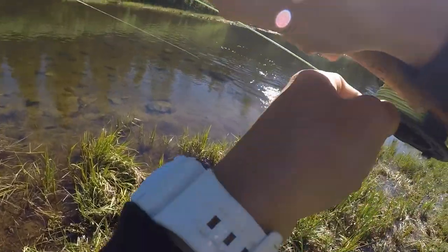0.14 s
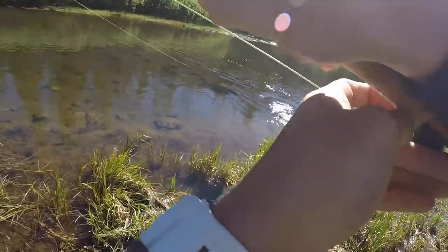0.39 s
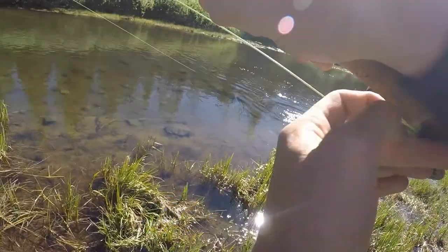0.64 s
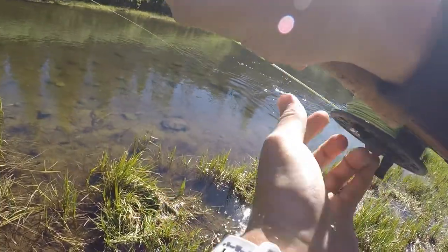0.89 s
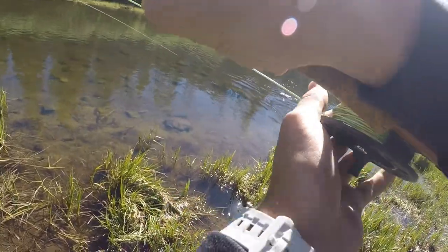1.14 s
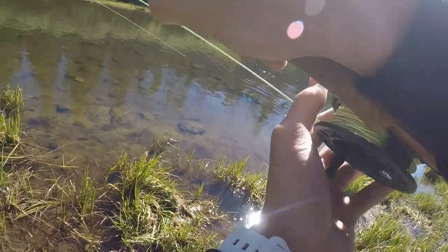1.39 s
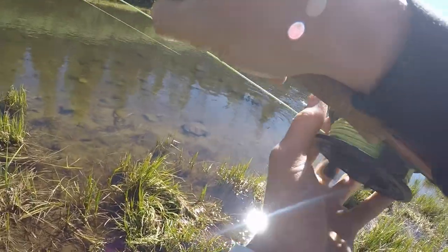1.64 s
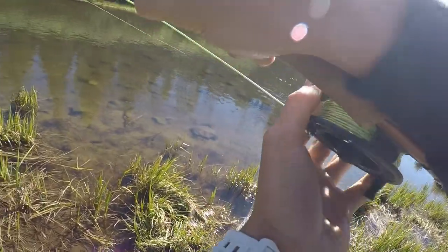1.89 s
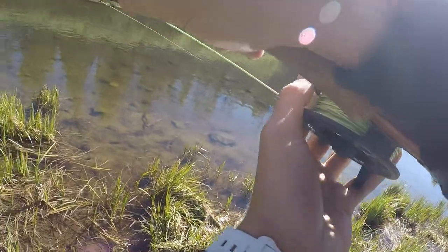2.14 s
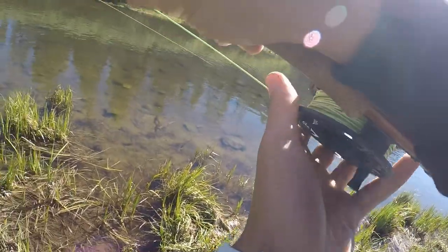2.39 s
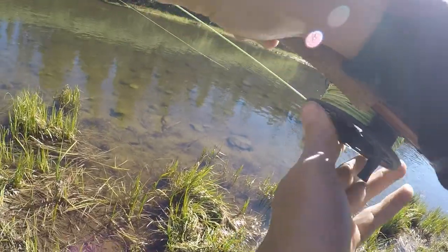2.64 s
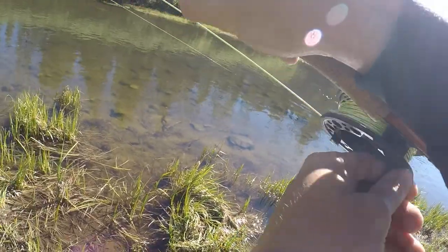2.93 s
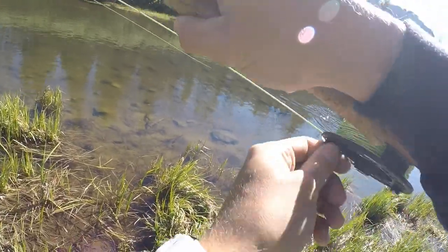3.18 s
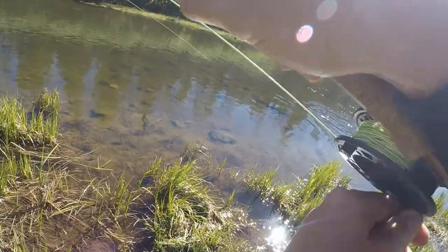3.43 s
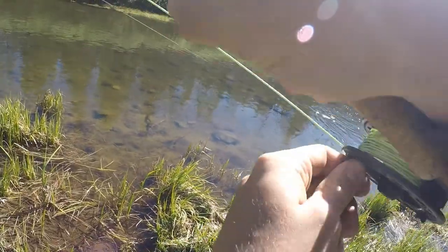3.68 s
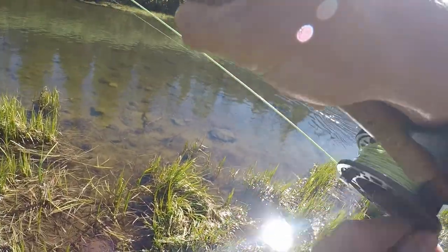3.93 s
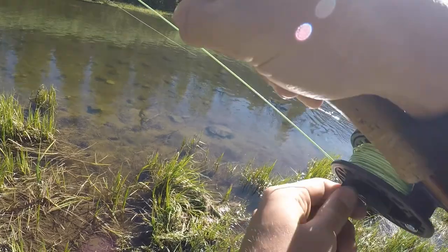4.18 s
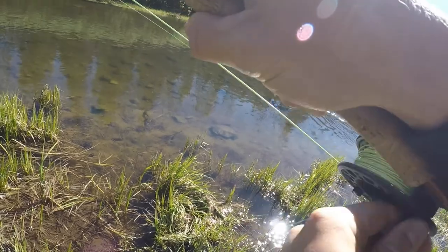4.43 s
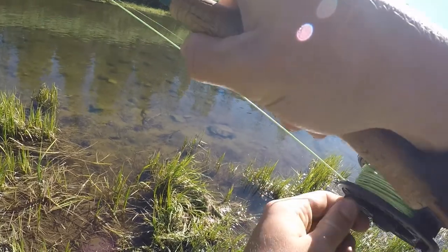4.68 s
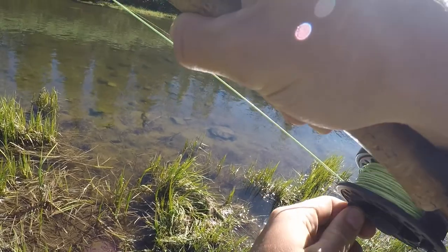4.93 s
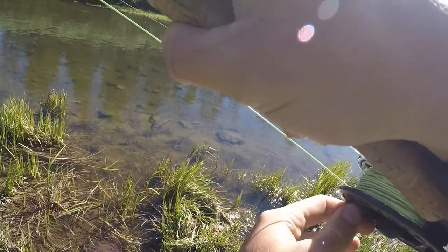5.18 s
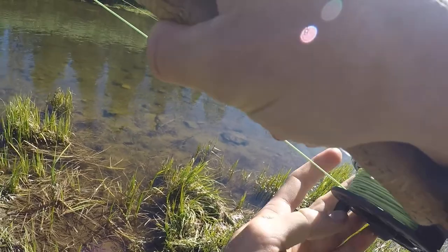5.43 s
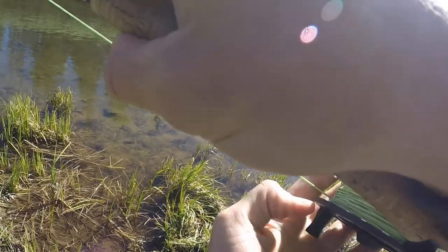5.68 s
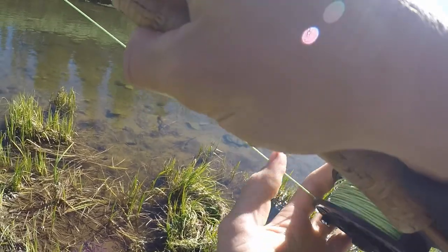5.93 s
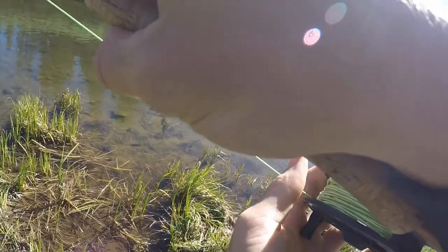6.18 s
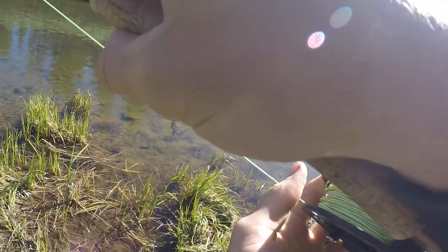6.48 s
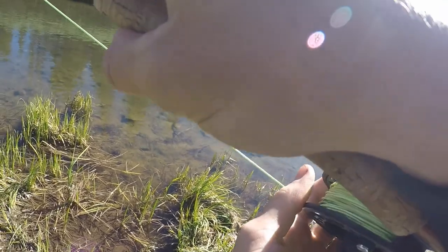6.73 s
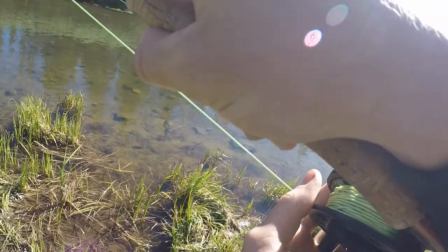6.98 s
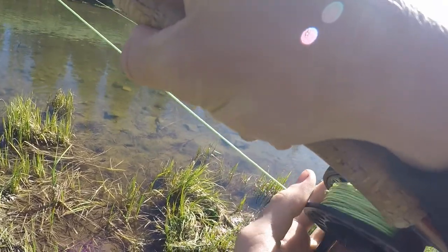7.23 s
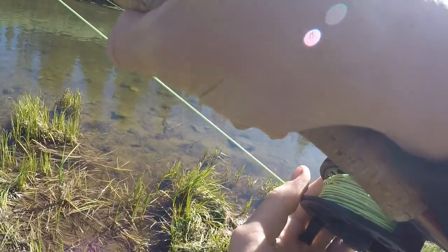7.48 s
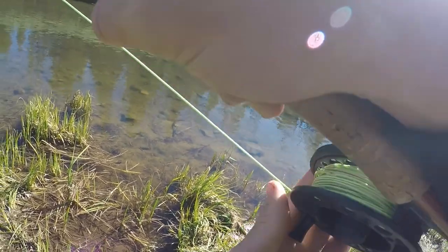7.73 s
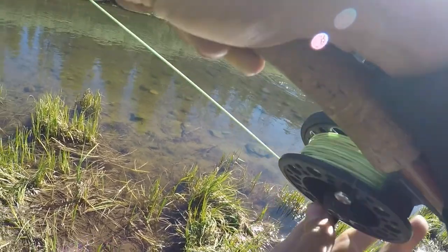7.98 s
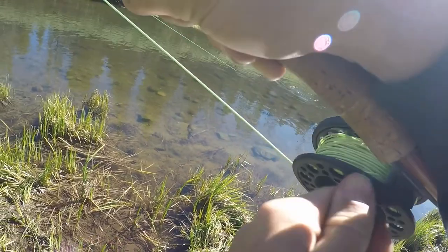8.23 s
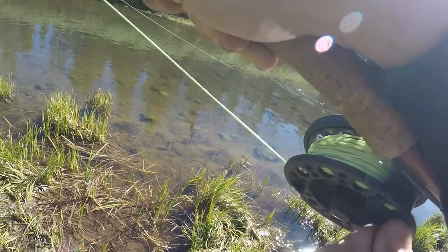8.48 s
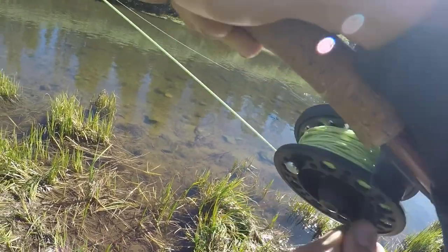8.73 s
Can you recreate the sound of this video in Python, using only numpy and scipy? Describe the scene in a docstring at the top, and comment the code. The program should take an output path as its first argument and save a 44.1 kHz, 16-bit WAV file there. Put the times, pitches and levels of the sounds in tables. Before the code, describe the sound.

A fly reel clicks close by in uneven bursts, from dry ticks to a fast ratcheting whirr, with hollow knocks over low wind rumble.

```python
"""Fly reel by a calm river

Close by, a spring pawl clicks over a 40-tooth gear while line is wound in and a fish pulls it out; each click
is a set of damped rings of cage, hub, rim and frame. The mount of a chest-worn camera knocks as a ringing
housing, the handle knob rattles, fingers tick and skin rubs as shaped noise. Bubbles glide up in pitch over
a noise wash, wind rumbles on the capsule over a distant drone, and something whistles faintly in gliding tones.
"""
import sys
import numpy as np
from scipy import signal
from scipy.fft import rfft, irfft, next_fast_len
from scipy.io import wavfile
from scipy.ndimage import uniform_filter1d, map_coordinates

SR = 44100
rng = np.random.default_rng(int(sys.argv[2]) if len(sys.argv) > 2 else 0)


def output_pcm(signal):
    """Save a mono or channel-first signal as 16-bit PCM at the path in sys.argv[1].

    Samples are clipped to [-1, 1] before scaling.
    """
    pcm = np.clip(np.atleast_2d(signal).T, -1, 1) * 32767
    wavfile.write(sys.argv[1], SR, np.round(pcm).astype(np.int16))


def decibels_to_gain(level_db):
    """Convert a level in decibels to a linear amplitude gain (20 dB per decade)."""
    exponent = np.asarray(level_db, float) / 20
    return 10 ** exponent


N = 390726

# All spectra are relative, as each noise is scaled to rms 1. Ring levels are relative unless called rms.
TEETH, SPOKES = 40, 4
# spells of turning one way: start_s, gap_tooth (a spoke gap faces the camera), nominal cage_hz
SPELLS = [(0, 3.4, 4280), (1, 7, 4460), (2.7, 9.5, 4335), (5.4, 4.6, 4620), (7.8, 11, 4395)]
# runs of the gear, one table each: time_s, teeth_passed
RUNS = [
    [(0.0018, 0), (0.0236, 6), (0.0541, 17), (0.0754, 26), (0.0954, 34), (0.1, 35), (0.1185, 37),
     (0.1346, 38)],
    [(0.2356, 40), (0.2716, 42), (0.3045, 46), (0.341, 54), (0.3559, 58), (0.3819, 64), (0.424, 76),
     (0.4305, 78), (0.4385, 79), (0.4547, 81), (0.4687, 82)],
    [(0.7874, 87), (0.8016, 88), (0.8457, 93), (0.8821, 101), (0.8857, 102), (0.8991, 105)],
    [(1.5114, 113), (1.5219, 114), (1.5355, 116), (1.5583, 121), (1.5931, 132), (1.6395, 153),
     (1.6461, 156), (1.6665, 166), (1.7199, 199), (1.7505, 220), (1.7648, 230), (1.7735, 236),
     (1.7926, 248), (1.8113, 260), (1.824, 268), (1.8293, 271), (1.8492, 281), (1.8696, 291), (1.8935, 303),
     (1.9075, 310), (1.9161, 314), (1.9208, 316), (1.9362, 322), (1.9657, 334), (1.9895, 344), (2.015, 354),
     (2.033, 359), (2.1109, 378), (2.1353, 382), (2.1502, 383)],
    [(2.9064, 387), (3.0212, 392), (3.0491, 394), (3.1225, 400), (3.2018, 403), (3.3076, 409),
     (3.3432, 412), (3.3944, 416), (3.4447, 419), (3.4683, 421), (3.538, 427), (3.6122, 432), (3.6555, 436),
     (3.6981, 441), (3.7651, 446), (3.8569, 452), (3.9507, 461), (4.0246, 469), (4.0763, 473),
     (4.1142, 477), (4.1601, 483), (4.2212, 489), (4.2658, 492), (4.3471, 499), (4.4127, 506),
     (4.4481, 509), (4.4819, 511), (4.586, 518), (4.5981, 519), (4.6406, 523), (4.6537, 524), (4.7368, 529),
     (4.7593, 530), (4.7928, 532), (4.8346, 534)],
    [(5.7977, 538), (5.8195, 539), (5.894, 543), (5.9234, 544), (5.9868, 549), (6.0539, 559), (6.0914, 567),
     (6.1191, 572), (6.1748, 574)],
    [(6.3313, 575), (6.3658, 576), (6.3978, 578), (6.4387, 581), (6.5402, 588), (6.605, 594), (6.6401, 598),
     (6.6971, 605), (6.7273, 607)],
    [(6.9147, 608), (6.9451, 609), (7.0126, 614), (7.05, 620), (7.0833, 626), (7.1792, 638), (7.2084, 642),
     (7.2527, 647), (7.3039, 651), (7.3471, 652), (7.3802, 653)],
    [(8.1542, 663), (8.188, 665), (8.2266, 669), (8.2608, 673), (8.3168, 678), (8.3682, 684), (8.4221, 690),
     (8.4774, 699), (8.5158, 704), (8.5325, 706), (8.5762, 712), (8.5853, 713), (8.6225, 717),
     (8.6731, 725), (8.7071, 730), (8.7771, 739), (8.8088, 744), (8.8544, 750)],
]
# single clicks and faint ticks, most of them between the runs: time_s, cage_db, rim_db, hub_db
LONE_CLICKS = [(0.1964, -29, -37, -36), (0.5234, -35.5, -70, -61), (0.6118, -42, -43, -43),
               (0.7363, -30.5, -47, -41.5), (1.0115, -27, -38, -39), (1.0937, -25.5, -42, -40),
               (1.1192, -26, -38.5, -43), (1.258, -24, -37.5, -36), (1.2949, -23.5, -41, -36),
               (1.3639, -26.5, -38.5, -34), (1.4383, -28, -39, -39), (1.487, -28.5, -38, -37),
               (2.4012, -37.5, -45, -44), (2.782, -41, -43.5, -48), (2.8572, -39, -43.5, -46),
               (3.5948, -33, -43, -44), (4.7865, -31, -36.5, -34), (4.9969, -20, -38, -35),
               (5.1007, -28.5, -40.5, -40), (5.4229, -37.5, -66.5, -78), (5.4852, -26.5, -41.5, -46),
               (5.5579, -43, -59.5, -55), (5.5774, -39, -42, -35), (5.6512, -25.5, -43.5, -36),
               (7.8844, -31, -36, -33), (7.9183, -29, -38, -31), (7.9691, -22.5, -38, -31),
               (8.0123, -36, -36.5, -32), (8.0382, -28, -39, -39), (8.0567, -26, -36, -32),
               (8.0741, -22.5, -35, -35), (8.0931, -41, -37, -38.0), (8.123, -33, -40, -33.5)]
# strength of running clicks as the reel is tilted and moved: time_s, cage_db, rim_db, hub_db
STRENGTH = [(0, -24, -39, -34), (0.05, -28, -37.5, -32), (0.13, -32, -41, -38.5), (0.3, -28, -35, -28),
            (0.37, -34, -42.5, -35.5), (0.425, -36, -36.5, -30), (0.47, -40, -38, -40),
            (0.8, -41, -37, -34.5), (0.86, -28, -39, -31), (0.9, -25.5, -41, -36),
            (1.5, -29.5, -37.5, -34.5), (1.75, -26, -32.5, -33), (1.82, -24, -33.5, -36),
            (1.9, -29, -35, -37.5), (2.15, -22.5, -37.5, -37), (2.9, -36, -42.5, -41),
            (3.2, -34.5, -44.5, -38.5), (3.35, -38, -43, -34), (3.65, -35.5, -39, -34),
            (3.9, -30, -41, -34), (4.1, -31.5, -40, -36.5), (4.33, -28.5, -41, -31.5),
            (4.55, -28.5, -41.5, -37.5), (4.83, -34, -42, -36), (5.8, -22, -42, -36), (5.95, -31, -44, -36),
            (6.04, -21.5, -43.5, -38), (6.5, -23, -42.5, -38.5), (7.4, -17.5, -47, -36),
            (8.15, -27, -35.5, -33.5), (8.27, -32, -34.5, -33), (8.4, -24, -38, -33.5),
            (8.5, -25, -37, -36), (8.56, -23, -36, -31.5), (8.6, -32, -34.5, -34.5),
            (8.76, -24.5, -38, -34.5), (8.86, -22, -33, -33)]
# swing of each ring round the spool, a row per spell: once_a_turn_db, loudest_tooth, twice_a_turn_db, loudest_tooth
CAGE_SWING = [(2, 15, 4, 13.3), (3, 16.6, 3.5, 11.5), (5.5, 14.8, 1.5, 2.2), (4, 34.8, 0, 14),
              (1, 16, 1.5, 11.5)]
RIM_SWING = [(2.7, 25.4, 0.55, 13), (0.3, 27, 0.24, 7.8), (1.7, 18.6, 0.1, 0.2), (0.81, 42, 0.51, 18),
             (2.4, 18.6, 0.84, 11)]
HUB_SWING = [(1.8, 28, 1.1, 16), (0.56, 13, 0.2, 5.3), (4, 35.3, 0.57, 11.6), (1.6, 39, 2.2, 16.7),
             (1.5, 1.8, 0.75, 1.8)]
LONE_SCATTER = 0.5  # share of full scatter
STEADY_PER_S = 800  # teeth a second at which the scatter is halved
# hub modes: pitch_hz, level_db in each spell, rise_ms, fall_ms
HUB_MODES = [(5080, (2.1, 3, 1.6, 2.4, 2), 0.031, 0.39), (6390, (3.5, 1.5, 0.5, 5, 2), 0.12, 0.23)]
# rim modes: pitch_hz, rise_ms, fall_ms, scatter_db, spoke_swing_db, facing_db in each spell
RIM_MODES = [(8300, 0.08, 0.25, 2.5, 4, (8.5, 6.9, 10.5, 10.4, 3.8)),
             (10350, 0.1, 0.33, 2.5, -0.5, (6, 3.5, 4, 12, -5)),
             (12150, 0.084, 0.21, 3, -2.5, (-1, 1, 2, 3.5, 0)),
             (14420, 0.2, 0.26, 3, 0, (0, 4, 3, 10.5, 4.5))]
# scale of each rim mode's random pitch drift as the spool turns: drift_share
RIM_DRIFT = [.045, .04, .035, .015]
BOUNCE_S, BOUNCE_DB = 0.0008, -6  # the pawl tip's second landing: mean delay and mean level
FRAME_HZ = 2985
# the frame's low ring over the rim level: level_db in each spell
FRAME_LEVELS = (2.5, 4.5, 2.5, 5.5, 0)
# pawl dragging up a slow tooth: time_s, level_db
DRAG = [(7.76, -77), (7.82, -58), (7.87, -52), (7.9, -71), (8.0, -60), (8.1, -59), (8.16, -57)]
# colour of the drag: pitch_hz, density_db per Hz
DRAG_COLOUR = [(2500, -120), (3600, -14), (4500, -6), (5400, -12), (7000, -36), (10000, -120)]
# camera mount knocks: start_s, level_db, thump_db relative to the knock
KNOCKS = [(0.068, -33.5, -3), (0.198, -19, -11.5), (0.352, -24, -7.5), (0.3575, -23.5, -16),
          (0.43, -28.5, -7), (0.442, -17.5, -14.5), (0.709, -19.5, -14.5), (0.843, -40, -3),
          (0.883, -32, -4.5), (1.015, -35, -21), (1.447, -36.5, -13), (1.63, -31.5, -5), (1.69, -34.5, -2),
          (2.092, -16, -14.5), (2.6, -40.5, 3), (2.903, -13, -15), (3.088, -33, -23), (4.983, -21.5, -10),
          (5.205, -21.5, -12.5), (5.227, -33, -7), (6.232, -41.5, 1), (8.341, -27, -9), (8.625, -26.5, -11)]
# modes of the mount's housing: pitch_hz, level_db relative to the knock, fall_ms
MOUNT_MODES = [(465, -17.5, 8.5), (649, -11, 9.6), (797, -15.5, 8.8), (978, -21.5, 9), (1185, -14, 1.7)]
# loose handle knob rattles: start_s, level_db
RATTLES = [(8.061, -37), (8.113, -34), (8.153, -18), (8.245, -26), (8.261, -35), (8.278, -34),
           (8.317, -30.5), (8.342, -32), (8.614, -26.5), (8.748, -37), (8.795, -31.5), (8.823, -36)]
# resonance of the knob: pitch_hz, density_db per Hz
KNOB_COLOUR = [(150, -120), (500, -12.5), (700, -12), (815, 2.5), (930, -13), (1300, -40), (2500, -120)]
# small ticks of fingers and line: start_s, level_db, pitch_hz
TICKS = [(0.181, -33.5, 2000), (0.5207, -32.5, 1020), (0.885, -26, 2830), (2.656, -39, 1810),
         (2.665, -43, 2800), (2.743, -35.5, 2760), (2.914, -29.5, 2740), (3.087, -35, 2130),
         (4.7848, -38, 1890), (5.072, -46, 1020), (5.688, -47, 3000), (5.702, -48, 2980),
         (5.722, -45, 2800), (5.784, -34, 3000), (5.893, -35.5, 2840), (5.956, -34.5, 2040),
         (7.9518, -40, 2130)]
# broad edge of a tick: pitch_hz, density_db per Hz
SNAP_COLOUR = [(250, -31), (900, -4), (3000, -5.5), (6000, -28), (12000, -38)]
# hand rubbing on grip and line: time_s, level_db
RUBBING = [(0.055, -61), (0.075, -41.5), (0.13, -51), (0.17, -55), (2.5, -74), (2.68, -55.5), (3.15, -61),
           (3.3, -88), (5.5, -85), (5.62, -66), (5.83, -45), (6.02, -58), (6.1, -54), (6.2, -70)]
# colour of the rubbing skin: pitch_hz, density_db per Hz
SKIN_COLOUR = [(120, -120), (300, 1), (550, -2.5), (1300, -14.5), (3000, -16), (6000, -120)]
# bubbles at the bank: start_s, level_db, pitch_hz, rise_share two fall times after the peak
BUBBLES = [(1.836, -20, 183, 0.065), (5.55, -41, 474, 0.1), (5.652, -34.5, 351, 0.65),
           (5.738, -39, 402, 0.13), (5.785, -34.5, 510, 0.18), (5.82, -29.5, 503, 0.34),
           (5.878, -29.5, 407, 0.054), (5.984, -35, 324, 0.11), (6.533, -46.5, 197, 0.1)]
# wind and water: time_s, rumble_rms_db, wash_db (relative)
AIR = [(0.0, -43.5, -52), (0.37, -26, -49), (0.49, -37, -50), (0.79, -32.5, -49.5), (1.4, -39, -53),
       (1.5, -28.5, -55.5), (1.68, -50, -42.5), (1.85, -31, -36), (2.32, -40.5, -51.5), (3.4, -42, -50),
       (3.7, -40.5, -46), (4.3, -40.5, -49.5), (6.4, -40.5, -52), (6.8, -42, -50), (7.16, -45.5, -53.5),
       (8.61, -41.5, -48), (8.86, -36.5, -45)]
# colour of the water wash: pitch_hz, density_db per Hz
WASH_COLOUR = [(53, -22), (90, 5.5), (188, -1.5), (420, -1.5), (664, -9), (1010, -9.5), (1600, -22),
               (2080, -13), (3520, -120)]
# colour of far river and microphone: pitch_hz, density_db per Hz
HISS_COLOUR = [(530, -34), (900, -11), (1120, -6), (1270, -8), (1560, -3), (3650, -2.5), (7040, -8.5),
               (7390, -7), (8340, -12), (13900, -14), (15100, -6), (16500, -69)]
# colour of the wind rumble: pitch_hz, density_db per Hz
RUMBLE_COLOUR = [(10, -12), (20, 11.5), (33, 4.5), (50, -0.5), (90, -19), (200, -25), (300, -31),
                 (440, -120)]
# colour of a distant steady drone: pitch_hz, density_db per Hz
DRONE_COLOUR = [(50, -54), (57, -8), (62, -1.5), (67, -6), (75, -48), (150, -120)]
HISS_RMS_DB, DRONE_RMS_DB = -55, -48.5
# faint whistles, perhaps a far bird: start_s, length_s, peak_db, from_hz, to_hz
WHISTLES = [(6.26, .032, -56, 3950, 3780), (8.046, .022, -52, 5300, 5500)]


def unit(x):
    """Normalization: divides by the root mean square."""
    return x / np.sqrt(np.mean(x ** 2))


def wobble(rate):
    """Slow random modulation: a smooth curve through rate random knots a second."""
    knots = rng.standard_normal(int(N * rate / SR) + 4)
    return map_coordinates(knots, [np.arange(N) * rate / SR])


def table_curve(points):
    """Linear interpolation of a time and level table."""
    time_s, level_db = points
    return np.interp(np.arange(N) / SR, time_s, level_db)


def noise(spectrum, patchy_db):
    """Filtered random noise: patches of random gain in time and pitch, then a colour, at rms 1."""
    z = signal.stft(rng.standard_normal(N), nperseg=1024)[2]
    field = uniform_filter1d(rng.standard_normal(z.shape), size=8, axis=0)
    field = unit(uniform_filter1d(field, size=4, axis=1))
    patchy = signal.istft(z * decibels_to_gain(patchy_db * field), nperseg=1024)[1][:N]
    size = next_fast_len(N)
    hz, density_db = np.transpose(spectrum)
    bin_hz = np.fft.rfftfreq(size, 1 / SR)
    gain = decibels_to_gain(np.interp(np.log(bin_hz + 1), np.log(hz + 1), density_db))
    return unit(irfft(rfft(patchy, size) * gain, size)[:N])


def place(s, shapes):
    """Superposition: sums one row of samples at each time."""
    at = np.round(s * SR).astype(int)[:, None] + np.arange(shapes.shape[1])
    keep = (at >= 0) & (at < N)
    return np.bincount(at[keep], shapes[keep], N)


def burst(s, db, hz, rise_ms, fall_ms, slip, glide=0, order=1):
    """Damped resonance: rings swell exponentially to a peak near s and decay exponentially.

    slip is the phase scatter in cycles; glide the pitch rise share two fall times on; order rounds the peak."""
    db, hz, glide = (np.reshape(v, (-1, 1)) for v in (db, hz, glide))
    first = np.round((s - 6 * rise_ms / 1000) * SR) / SR
    t = (first - s)[:, None] + np.arange(int((6 * rise_ms + 8 * fall_ms) * SR / 1000)) / SR
    rise = np.exp(-1000 * t / rise_ms / order)
    fall = np.exp(1000 * t / fall_ms / order)
    swell = 0.7 * (2 / (rise + fall)) ** order
    cycles = hz * t * (1 + glide * t * 250 / fall_ms) + slip * rng.standard_normal((len(s), 1))
    return place(first, decibels_to_gain(db) * swell * np.cos(2 * np.pi * cycles))


def tooth_times(run):
    """Kinematics of the gear: a smooth, never reversing curve gives the moment each tooth passes the pawl."""
    s, teeth = np.transpose(run)
    step = np.diff(teeth)
    gap = np.diff(s) / step
    # harmonic means of neighbouring gaps keep the curve from reversing
    slope = np.r_[gap[0], 2 * gap[1:] * gap[:-1] / (gap[1:] + gap[:-1]), gap[-1]]
    tooth = np.arange(teeth[0], teeth[-1] + 1)
    i = np.minimum(np.searchsorted(teeth, tooth, "right") - 1, len(gap) - 1)
    u = (tooth - teeth[i]) / step[i]
    bend = (1 - u) * ((1 - u) * (slope[i] - gap[i]) - u * (slope[i + 1] - gap[i]))
    return tooth, s[i] + u * step[i] * (gap[i] + bend)


def spell_of(s):
    """Piecewise states: which spell of turning each moment lies in."""
    return np.searchsorted(np.transpose(SPELLS)[0], s, "right") - 1


def clicks():
    """Periodic modulation: the turning spool swings the cage, rim and hub levels of the running clicks."""
    tooth, s = np.hstack([tooth_times(run) for run in RUNS])
    when, *strengths = np.transpose(STRENGTH)
    turn = 2 * np.pi / TEETH
    levels = []
    for strength_db, swing in zip(strengths, (CAGE_SWING, RIM_SWING, HUB_SWING)):
        once_db, first, twice_db, second = np.transpose(swing)[:, spell_of(s)]
        once = once_db * np.cos(turn * (tooth - first))
        twice = twice_db * np.cos(2 * turn * (tooth - second))
        levels.append(np.interp(s, when, strength_db) + once + twice)
    # the pawl rides more evenly the faster the teeth pass
    scatter = 1 / (1 + 1 / (np.gradient(s) * STEADY_PER_S))
    running = np.array([tooth, s, *levels, scatter])
    lone = np.transpose(LONE_CLICKS)
    lone_scatter = np.full(len(LONE_CLICKS), LONE_SCATTER)
    single = np.array([np.interp(lone[0], s, tooth), *lone, lone_scatter])
    return np.hstack([running, single])


def tooth_luck(count, columns):
    """Correlated randomness: neighbouring teeth sound partly alike."""
    own = rng.standard_normal((count, columns))
    common = uniform_filter1d(rng.standard_normal((count, columns)), size=7, axis=0)
    return unit(own + 2.2 * common).T


def cage_ring(s, cage_db, hub_db, scatter):
    """Directivity: seen off its beam the cage rings higher, towards the hub."""
    level_luck, pitch_luck = tooth_luck(len(s), 2) * scatter
    cage_hz = np.transpose(SPELLS)[2, spell_of(s)]
    cage_hz = cage_hz * (1 + 0.0025 * (hub_db - cage_db + 16) + 0.017 * pitch_luck)
    return burst(s, cage_db + 4 + 1.92 * level_luck, cage_hz, rise_ms=0.25, fall_ms=0.3,
                 slip=0.16 * scatter[:, None], order=3)


def hub_ring(s, hub_db, scatter):
    """Modal ringing: the hub answers each click with damped modes of scattered level and pitch."""
    x = np.zeros(N)
    for hz, spell_db, rise_ms, fall_ms in HUB_MODES:
        level_luck, pitch_luck = tooth_luck(len(s), 2) * scatter
        level_db = hub_db + np.array(spell_db)[spell_of(s)] + 3 * level_luck
        ring_hz = hz * (1 + 0.041 * pitch_luck)
        x += burst(s, level_db, ring_hz, rise_ms, fall_ms, slip=0.066 * scatter[:, None], order=2)
    return x


def rim_ring(tooth, s, rim_db, scatter):
    """Repeated impact: the pawl tip lands twice on the rim modes, which passing spokes pattern."""
    x = np.zeros(N)
    spell = spell_of(s)
    gap_tooth = np.transpose(SPELLS)[1, spell]
    window = np.cos(2 * np.pi * SPOKES * (tooth - gap_tooth) / TEETH)
    slip = 0.16 * scatter[:, None]
    for mode, drift in zip(RIM_MODES, RIM_DRIFT):
        hz, rise_ms, fall_ms, scatter_db, swing_db, facing_db = mode
        level_luck, pitch_luck = tooth_luck(len(s), 2)
        level_db = rim_db + np.array(facing_db)[spell] + scatter_db * level_luck + swing_db * window
        ring_hz = hz * (1 + drift * scatter * pitch_luck)
        landing = s - 0.00045
        x += burst(landing, level_db, ring_hz, rise_ms, fall_ms, slip)
        late, uneven = scatter * unit(uniform_filter1d(rng.standard_normal((2, len(s))), size=4))
        second = landing + BOUNCE_S * (1 + 0.3 * late)
        x += burst(second, level_db + BOUNCE_DB + 3.5 * uneven, ring_hz, rise_ms, fall_ms, slip)
    return x


def frame_ring(s, rim_db, scatter):
    """Modal ringing: the frame has one low mode that follows the rim level."""
    level_luck, pitch_luck = tooth_luck(len(s), 2)
    level_db = rim_db + np.array(FRAME_LEVELS)[spell_of(s)] + 1.9 * level_luck
    return burst(s - 0.0003, level_db, FRAME_HZ * (1 + 0.02 * pitch_luck), rise_ms=0.1, fall_ms=0.7,
                 slip=0.17 * scatter[:, None])


def metal_crack(s, rim_db):
    """Broadband impact: the crack of metal on metal fills the gaps between the modes."""
    t = np.arange(200) / SR
    edge = np.diff(rng.standard_normal((len(s), 201)))  # differencing favours the treble
    envelope_db = rim_db[:, None] - 36 - 60 * np.abs(t - 0.001) / 0.0062
    return place(s - 0.0012, edge * decibels_to_gain(envelope_db))


def reel():
    """Impact excitation: each click rings cage, hub, rim and frame alike."""
    tooth, s, cage_db, rim_db, hub_db, scatter = clicks()
    cage = cage_ring(s, cage_db, hub_db, scatter)
    rest = hub_ring(s, hub_db, scatter) + rim_ring(tooth, s, rim_db, scatter)
    rest += frame_ring(s, rim_db, scatter) + metal_crack(s, rim_db)
    return cage, rest


def surroundings(cage, rest):
    """Scattering: moving hands, chest and ground return the reel briefly, never twice alike."""
    t = np.arange(SR // 20) / SR
    replies = rng.standard_normal((5, len(t))) * decibels_to_gain(-60 * t / 0.026) * (t > 0.0008)
    # skin, cloth and grass swallow the treble above 5300 Hz
    replies = signal.lfilter(*signal.butter(2, 5300, fs=SR), replies)
    replies = replies / np.linalg.norm(replies, axis=1)[:, None]
    share = np.array([wobble(40) for _ in replies])
    share = share / np.linalg.norm(share, axis=0)
    # the cage beams its ring, so less of it comes back by way of the surroundings
    back = (decibels_to_gain(-22) * cage + decibels_to_gain(-9.5) * rest) * share
    return signal.fftconvolve(back, replies, axes=1).sum(0)[:N]


def pawl_drag():
    """Friction: the pawl scrapes softly, as unsteady noise, up a slow tooth."""
    level_db = table_curve(np.transpose(DRAG)) + 4.5 * wobble(160)
    return decibels_to_gain(level_db) * noise(DRAG_COLOUR, patchy_db=2.5)


def mount():
    """Modal impact: a knock swells, rings the housing at new strengths and thumps the capsule."""
    s, db, thump_db = np.transpose(KNOCKS)
    luck = rng.standard_normal((len(MOUNT_MODES), len(s)))
    x = burst(s + 0.00264, db, 726, rise_ms=0.79, fall_ms=1.0, slip=0.012)
    for (hz, level_db, fall_ms), mode_luck in zip(MOUNT_MODES, luck):
        x += burst(s + 0.002895, db + level_db + 2.4 * mode_luck, hz, 0.29, fall_ms, slip=0.053)
    return x + burst(s + 0.0045, db + thump_db + 11.5, 250, rise_ms=0.41, fall_ms=1.76, slip=0.026)


def knob_rattle():
    """Resonance: the loose knob chatters as bursts of noise in its one resonance."""
    s, db = np.transpose(RATTLES)
    # a burst at 0 Hz is a bare envelope
    chatter = burst(s + 0.003, db - 4, 0, rise_ms=5.7, fall_ms=9.6, slip=0)
    return chatter * noise(KNOB_COLOUR, patchy_db=0)


def finger_ticks():
    """Light impact: fingers and line give short, rough rings with a broad noise edge."""
    s, db, hz = np.transpose(TICKS)
    ring = burst(s + 0.001854, db + 1.5, hz, rise_ms=0.65, fall_ms=1.4, slip=0.27)
    edge = burst(s + 0.0013, db - 5.5, 0, rise_ms=0.65, fall_ms=2.8, slip=0)
    return (ring + edge * noise(SNAP_COLOUR, patchy_db=2.5)) * decibels_to_gain(2.5 * wobble(900))


def skin_rub():
    """Friction: skin rubs on grip and line in grains, as unsteady noise."""
    level_db = table_curve(np.transpose(RUBBING)) + 4.3 * wobble(70)
    return decibels_to_gain(level_db) * noise(SKIN_COLOUR, patchy_db=1.5)


def water():
    """Bubble resonance: rings glide up in pitch over a patchy noise wash; the far river hisses."""
    s, db, hz, rise = np.transpose(BUBBLES)
    bubbles = burst(s + 0.0073, db, hz, rise_ms=5.8, fall_ms=8.2, slip=0.24, glide=rise)
    bubbles *= decibels_to_gain(2.5 * wobble(120))
    when, _, wash_db = np.transpose(AIR)
    wash = decibels_to_gain(table_curve((when, wash_db)) + 1 + 1.2 * wobble(18)) * noise(WASH_COLOUR, patchy_db=2)
    return bubbles + wash + decibels_to_gain(HISS_RMS_DB) * noise(HISS_COLOUR, patchy_db=1.5)


def wind():
    """Turbulence: lumpy low pressure on the capsule, as low noise of varying level."""
    when, rumble_db, _ = np.transpose(AIR)
    return decibels_to_gain(table_curve((when, rumble_db))) * noise(RUMBLE_COLOUR, patchy_db=0.9)


def drone():
    """Narrow-band noise: a distant steady drone."""
    return decibels_to_gain(DRONE_RMS_DB) * noise(DRONE_COLOUR, patchy_db=0.5)


def whistles():
    """Frequency modulation: thin sine tones glide linearly in pitch."""
    t = np.arange(N) / SR
    x = np.zeros(N)
    for s, length, db, from_hz, to_hz in WHISTLES:
        u = np.clip((t - s) / length, 0, 1)
        swell = np.sqrt(np.abs(np.sin(np.pi * u)))
        cycles = length * u * (from_hz + (to_hz - from_hz) * u / 2)
        x += decibels_to_gain(db) * swell * np.sin(2 * np.pi * cycles)
    return x


def scene():
    """Superposition: all sources add at one capsule."""
    cage, rest = reel()
    close = cage + rest + surroundings(cage, rest) + pawl_drag()
    hands = mount() + knob_rattle() + finger_ticks() + skin_rub()
    background = water() + wind() + drone() + whistles()
    return (close + hands + background)[None]


def band_limit(x):
    """A steep low-pass at the top of the band."""
    return signal.sosfilt(signal.butter(12, 16640, fs=SR, output="sos"), x)


def record(dry):
    """Signal chain: the finished mix passes through the camera's last stage."""
    return band_limit(dry)


dry = scene()
out = record(dry)
output_pcm(out)
```